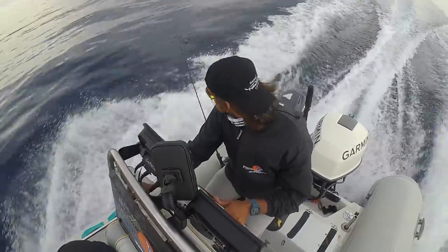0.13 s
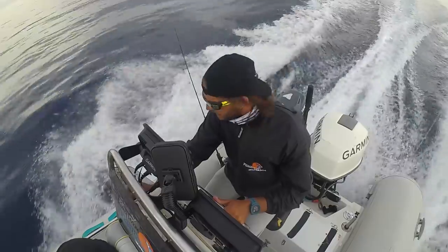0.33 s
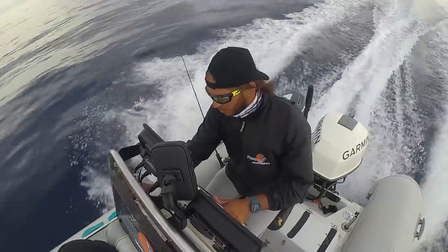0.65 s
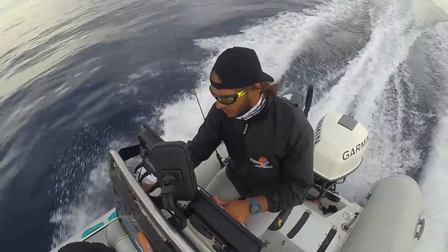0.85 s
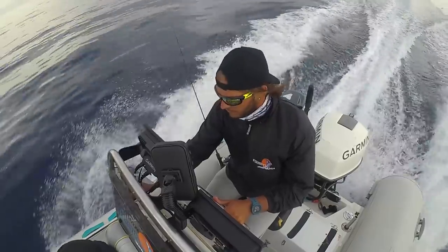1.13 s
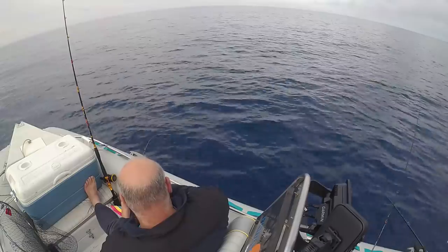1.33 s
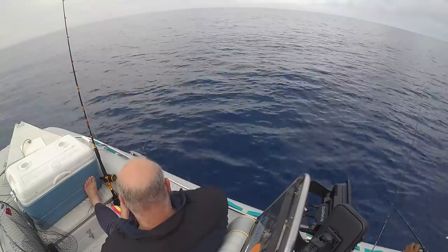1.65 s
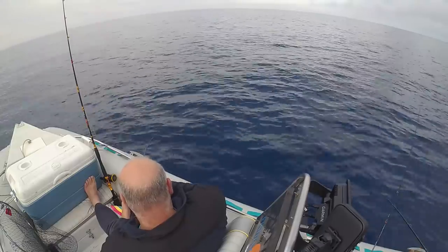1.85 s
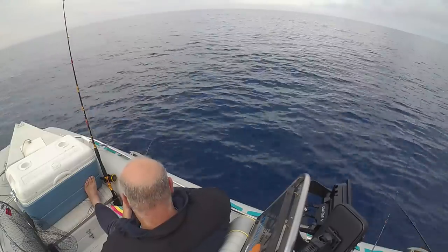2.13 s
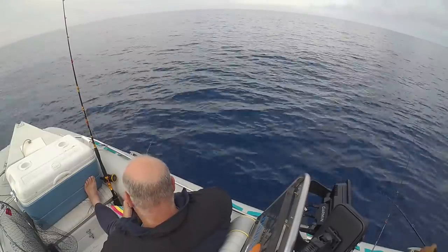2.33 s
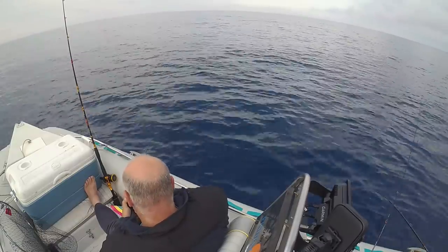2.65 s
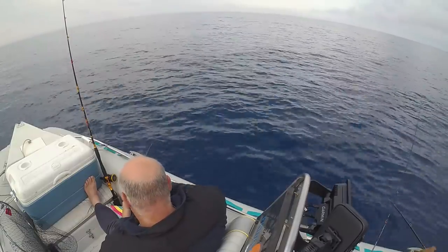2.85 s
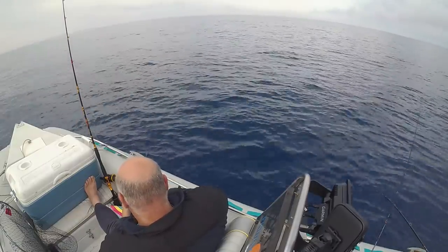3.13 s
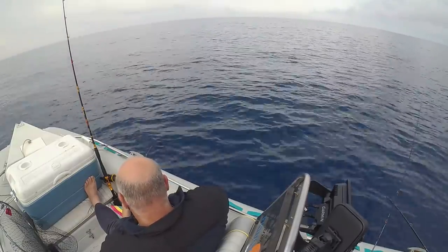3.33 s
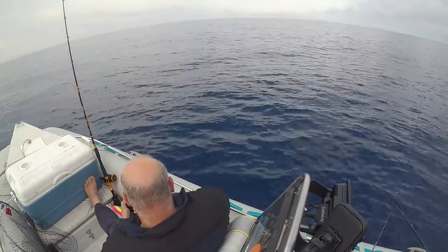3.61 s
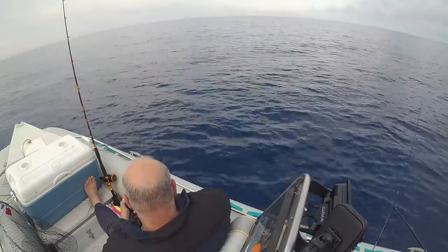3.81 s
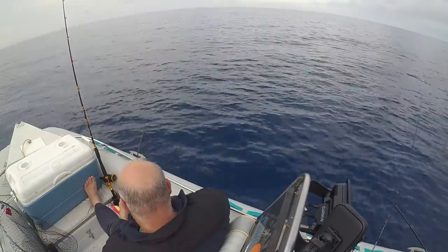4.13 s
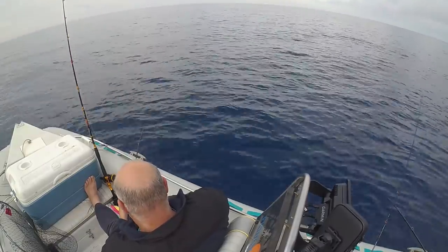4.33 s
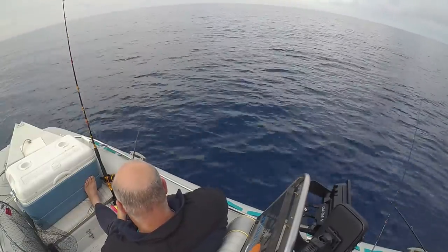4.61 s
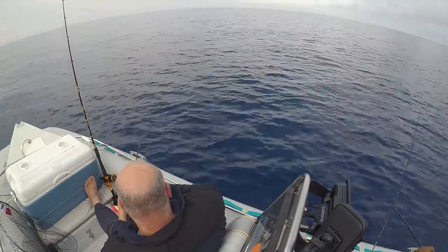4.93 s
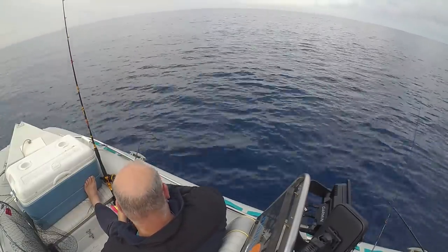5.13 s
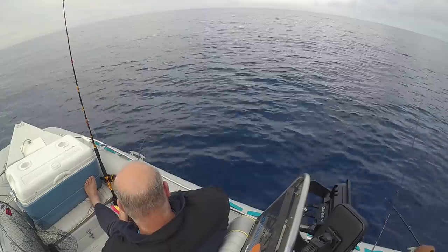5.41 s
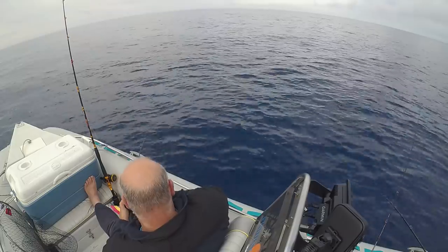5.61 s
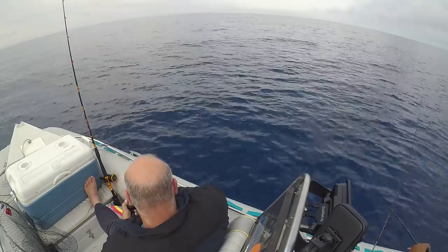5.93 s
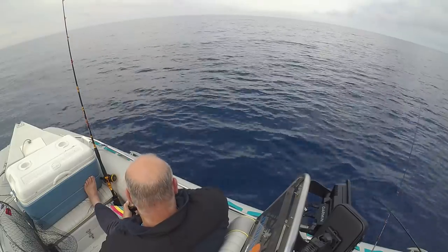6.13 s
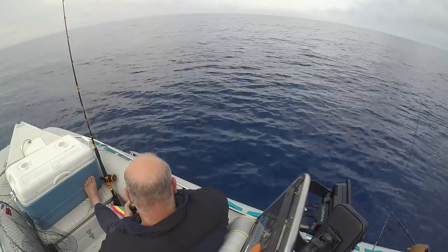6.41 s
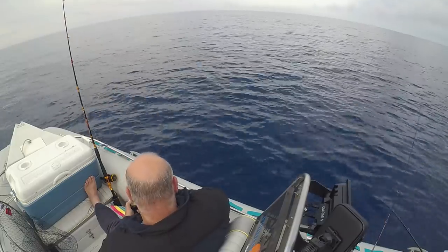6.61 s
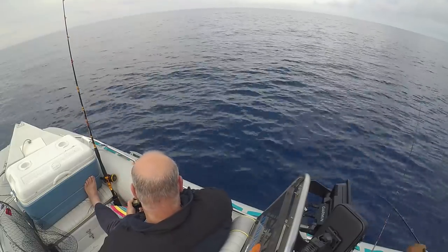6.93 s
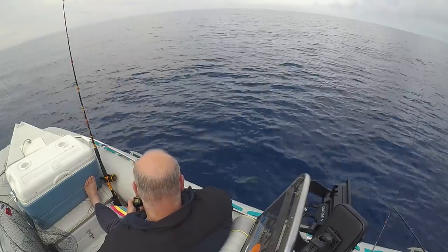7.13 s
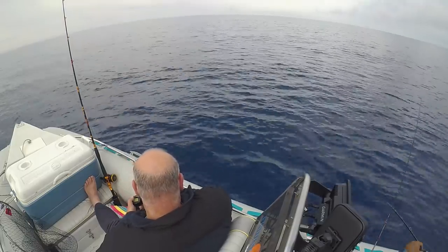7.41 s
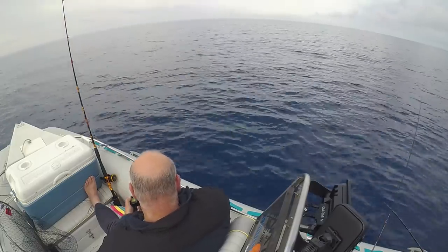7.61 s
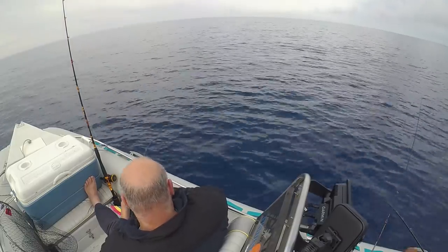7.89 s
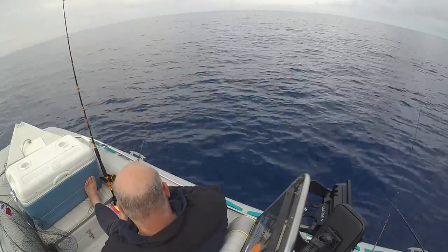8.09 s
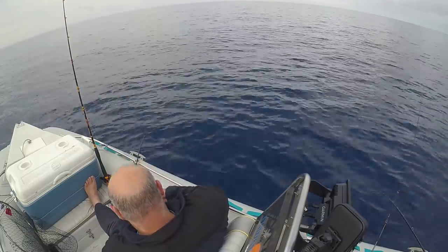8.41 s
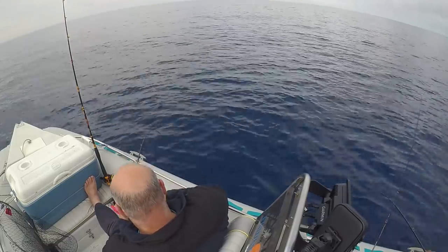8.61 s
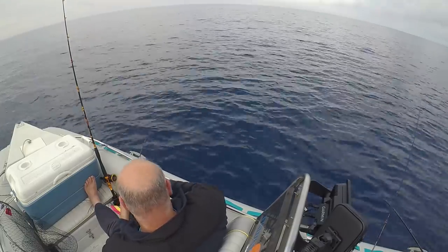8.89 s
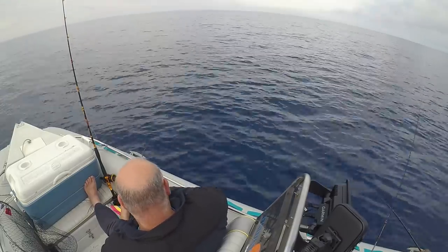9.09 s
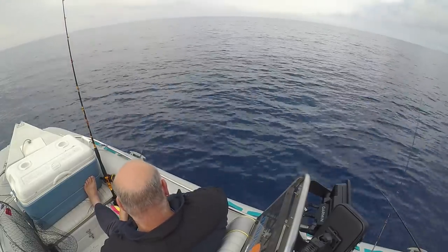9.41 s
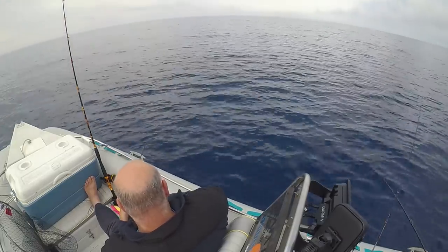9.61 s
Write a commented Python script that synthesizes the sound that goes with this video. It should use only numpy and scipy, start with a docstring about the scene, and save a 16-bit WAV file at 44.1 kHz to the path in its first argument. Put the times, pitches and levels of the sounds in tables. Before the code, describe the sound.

Muffled outboard drone and rushing water for about a second, a hard cut, then slow chugging idle with irregular rattling and dull hull thuds.

```python
"""A planing boat comes first: an outboard drone in the hull, with wind on a sealed case, wash and spray.
After a cut with a short silence the four-stroke motor idles. Its crank angle times exhaust thumps, floor booms,
cowl shakes and valve ticks. A loose part, knocks and clicks ring as decaying modes and noise bursts.
Underneath, coloured noise makes the wind, the lapping water and a thin whirr."""
import sys
import numpy as np
from scipy import signal
from scipy.fft import rfft, irfft, next_fast_len
from scipy.io import wavfile
from scipy.ndimage import uniform_filter1d, map_coordinates

SR = 44100
rng = np.random.default_rng(int(sys.argv[2]) if len(sys.argv) > 2 else 0)


def bounce(signal):
    """Save signal as a 16-bit WAV file at the path given by the first command-line argument."""
    frames = np.transpose(np.atleast_2d(signal))
    limited = np.clip(frames, -1, 1)
    pcm = np.round(limited * 32767).astype(np.int16)
    wavfile.write(sys.argv[1], SR, pcm)


N = 429975

# silence between the two scenes: (planing ends [s], idling starts [s])
GAP = (1.2417, 1.2536)
# layers while planing: (time [s], wind level [dB], wash level [dB], spray level [dB])
PLANING_LEVELS = [(0.0, -30, -25, -31), (0.22, -27, -25.5, -33.5), (0.335, -21.5, -22.5, -31),
                  (0.47, -28, -22.5, -31.5), (0.624, -37, -23, -33), (0.694, -19, -24.5, -34.5),
                  (0.96, -32, -24, -35.5), (0.998, -28, -25.5, -32.5), (1.24, -29, -24.5, -36.5)]
# hull drone while planing: (time [s], level [dB])
DRONE_LEVELS = [(0.0, -16.5), (0.082, -13), (0.116, -33), (0.144, -18), (0.746, -20), (0.772, -16.5),
                (0.818, -26.5), (0.91, -16), (0.976, -26), (1.014, -17), (1.24, -21)]
# idle speed: (time [s], four-stroke cycles per second [Hz])
IDLE_SPEED = [(1.25, 11.004), (1.89, 11.972), (2.01, 11.858), (2.65, 12.037), (3.37, 11.736),
              (3.49, 11.536), (3.85, 11.35), (4.53, 12.13), (4.65, 11.358), (5.21, 11.261), (5.53, 11.302),
              (5.65, 11.781), (5.93, 11.659), (6.05, 11.999), (6.41, 11.486), (6.73, 11.585),
              (7.37, 11.301), (7.81, 11.637), (8.17, 11.254), (8.73, 12.058), (9.21, 10.859),
              (9.75, 11.238)]
# two exhaust pulses in each cycle: (first [share of cycle], second [share of cycle])
FIRINGS = (.422, .84)
# exhaust resonances, each pass: (centre [Hz], width [Hz], gain [dB])
EXHAUST_MODES = [(15, 40, -.6), (48.1, 8, 0)]
# booming floor panel, each pass: (centre [Hz], width [Hz], gain [dB])
FLOOR_MODES = [(100.5, 11, 2)]
# floor boom at idle, before its random waver: (time [s], level [dB])
BOOM_LEVELS = [(1.26, -19), (1.3, -25.5), (2.28, -30.5), (2.32, -44), (2.37, -27), (3.52, -35), (3.6, -31),
               (3.77, -27), (3.81, -39.5), (4.12, -24.5), (4.38, -37.5), (4.43, -25), (4.5, -45),
               (4.78, -27.5), (5.16, -36.5), (5.23, -27.5), (5.75, -30.5), (5.82, -50), (5.89, -25.5),
               (6.2, -38), (6.63, -28), (6.67, -44), (6.77, -27), (7.05, -35), (7.1, -25.5), (7.36, -50),
               (7.41, -34), (7.74, -24.5), (7.79, -46), (7.9, -20), (7.97, -40), (8.4, -26), (8.97, -40),
               (9.75, -30)]
# cowl resonances, each pass: (centre [Hz], width [Hz], gain [dB])
COWL_MODES = [(185.1, 47.6, -2), (263, 9.3, -6)]
# shakes of the cowl: (angle [share of cycle], strength [dB])
COWL_SHAKES = [(.645, 1.5), (.955, 0), (.265, -3.5)]
# contacts in every cycle: (angle [share of cycle], rms level [dB], centre [Hz], width [octaves], t60 [s])
CONTACTS = [(.06, -67.5, 5200, .4, .16), (.065, -73, 3815, .05, .07), (.312, -72, 5700, .45, .012),
            (.347, -71.5, 6400, .5, .03), (.45, -71, 5600, .3, .05), (.64, -71, 3850, .06, .05),
            (.6, -65.5, 4900, .45, .14), (.64, -88, 10300, .15, .08), (.88, -65, 4800, .8, .15),
            (.9, -75, 3800, .08, .06), (.308, -62.5, 1300, .5, .11), (.315, -71, 1592, .064, .15),
            (.33, -73, 2600, .15, .25), (.455, -63, 2130, .5, .3), (.46, -70, 2060, .08, .15),
            (.76, -73, 1930, .1, .05), (.05, -54.5, 428, .18, .07), (.088, -67, 1050, .097, .076),
            (.21, -61, 680, .23, .085), (.48, -66, 1100, .29, .06), (.66, -57, 300, .18, .037),
            (.69, -61, 700, .18, .15), (.72, -52.5, 416, .14, .057), (.88, -68, 900, .17, .15)]
# loud rattles: (time [s], level [dB], second pair over it [dB])
RATTLE_HITS = [(1.654, -29, -0.5), (1.765, -22.5, -12), (1.849, -23.5, -8), (1.934, -28, -4),
               (1.988, -43, 0.5), (2.105, -28.5, -8), (2.271, -32.5, 1), (2.459, -31.5, 2.5),
               (2.503, -26, -3), (3.061, -33, -26), (3.242, -33, -5), (3.36, -24, -4.5), (3.439, -27, -12),
               (3.53, -40, 6.5), (3.829, -24.5, -8), (3.942, -35.5, 1), (4.076, -29, 4), (4.203, -38, 7.5),
               (4.313, -31, -6), (4.365, -33.5, 1), (4.481, -35, -15), (4.709, -36, 1), (4.849, -25, -14),
               (4.885, -28, -4), (4.975, -36.5, 8), (5.418, -34.5, 0.5), (5.679, -30, 1), (5.815, -40, 4),
               (5.848, -31.5, -3), (5.887, -22, -5.5), (5.991, -23.5, -1), (6.134, -23.5, -10),
               (6.218, -22.5, -23), (6.306, -29.5, -22), (6.354, -31, -4), (6.393, -29, -22),
               (6.479, -26, -16), (6.562, -28, -3.5), (6.734, -35, 2), (6.788, -42.5, 0),
               (6.909, -35.5, 0.5), (7.057, -46, 14), (7.403, -37, 4.5), (7.491, -33, -2),
               (7.582, -39.5, 8.5), (7.789, -23.5, -16.5), (7.87, -22.5, -20), (7.955, -24, -11),
               (8.04, -28, -1.5), (8.454, -37, 6), (8.935, -32, 0), (9.101, -35, -2), (9.409, -28.5, -5),
               (9.505, -33.5, 3.5), (9.679, -32, -4)]
# modes of the loose part: (frequency [Hz], relative level [dB], t60 [s])
LOOSE_MODES = [(331.5, 3, 0.078), (358.4, -11.5, 0.15), (423.5, 1.5, 0.1), (465, 0.5, 0.09),
               (651, -8, 0.073), (722.5, -14, 0.12), (1028, -14, 0.044)]
# modes whose strength depends on where the part lands: (lower [row], upper [row])
SECOND_PAIR = (2, 3)
# dull hull knocks, low from waves, high from handling: (time [s], level [dB], frequency [Hz], t60 [s])
KNOCK_HITS = [(1.012, -10.5, 134.2, 0.27), (1.289, -39, 118.5, 0.54), (1.323, -10.5, 195, 0.08),
              (1.391, -29.5, 970, 0.033), (2.791, -36, 1385, 0.023), (3.727, -25, 613, 0.043),
              (3.834, -12.5, 183.7, 0.19), (3.867, -31, 126, 0.11), (5.291, -28, 492, 0.068),
              (5.311, -19.5, 128, 0.39), (3.069, -25, 252, 0.18), (7.132, -26, 361, 0.11),
              (8.369, -23, 1340, 0.0094), (9.68, -26, 188, 0.22)]
# thin clicks of tackle: (time [s], level [dB])
CLICK_HITS = [(1.4242, -56), (1.4962, -56), (4.35, -58), (4.77, -57), (5.29, -57), (7.0687, -57)]
# muffling case with two port resonances: (frequency [Hz], gain [dB])
CASE_COLOUR = [(240, -10), (400, 0), (700, -10), (1020, -14), (1600, -18.5), (2400, -26), (3400, -25.5),
               (3950, -21), (4380, -10.5), (4900, -24), (5800, -29.5), (6400, -36), (7500, -42),
               (9000, -49), (10000, -34), (11500, -44.5), (14000, -55.5), (15000, -67.5), (16000, -120)]
# spectrum of the water under the planing hull: (frequency [Hz], relative level [dB per Hz])
WASH_COLOUR = [(65, -16), (110, -3.5), (124, -12.5), (173, -10), (340, -14), (518, -34), (1200, -43),
               (1560, -89), (2640, -120)]
# spectrum of the water against the idling hull: (frequency [Hz], relative level [dB per Hz])
LAPPING_COLOUR = [(29, -44.5), (50, -7), (108, -5.5), (147, -11.5), (201, -6), (303, -18.5), (413, -21),
                  (546, -24), (1580, -37.5), (2500, -53.5), (3250, -68.5), (5500, -120)]
# wind on the case at idle: (time [s], level [dB])
BREEZE_LEVELS = [(1.26, -24), (1.45, -36), (4.8, -36), (5.3, -33), (5.9, -38), (8.6, -59), (9.3, -32.5),
                 (9.75, -33)]
# panel that carries the drone, each pass: (centre [Hz], width [Hz], gain [dB])
DRONE_PANEL = [(82.0, 70, 0)]
# wind spectra, planing and idling: (frequency [Hz], relative level [dB])
PLANING_WIND = [(8, -36), (20, -5.0), (60, -1.0), (85, -1.0), (200, -65), (400, -120)]
IDLE_WIND = [(6, -36.5), (14, 8.5), (24, 5.0), (70, -24.0), (120, -62.0), (300, -120)]

DRONE_HZ = 93.9
FIRST_ANGLE, UNEVEN = .154, .002  # crank angle at the start of idling, and its wander [share of cycle]
FLOOR_SHAKE = .14  # angle at which the floor is struck [share of cycle]
BOOM_WAVER_DB = 2  # random swell and dip of the boom
LASH_S, VALVE_SCATTER_DB = .0003, 1.4  # play in the timing and strength of each contact
CRACK_DB = -13.5  # noise crack relative to the rattle level
TOP_FADES = 0.24  # dB the top mode loses for each dB the second pair gains
LANDING_DB = 1.5  # chance in the strength of each mode at each rattle
CLICK_HZ, CLICK_T60_S = 8000, 0.028  # lower edge, decay
WHIRR_DB, WHIRR_TILT = -64.5, .8  # level, and power of frequency by which it brightens
CLIP_AT = .6  # amplitude near which peaks round off
TOP_HZ = 15000  # upper band limit


def hull_drone(tone):
    """Firing drone in the hull: a wavering tone with a noise band from a broad panel resonance."""
    panel = modes(DRONE_PANEL)
    roughness = rush(lambda f: panel(f) ** 2, patchy_db=1.0)
    level_db, = curves(DRONE_LEVELS)
    return amp(level_db) * (0.96 * tone + 0.35 * roughness)


def exhaust(turned):
    """Each cylinder's firing is an impulse that thumps through the exhaust resonances."""
    firings = sum(beats(turned, share, scatter_db=1.5) for share in FIRINGS)
    return amp(-30.0) * unit(filtered(firings, twice(EXHAUST_MODES)))


def floor_boom(turned):
    """The motor block strikes the floor panel once a cycle; noise in the panel's own resonance blurs it."""
    panel = twice(FLOOR_MODES)
    struck = unit(filtered(beats(turned, FLOOR_SHAKE, scatter_db=-0.5), panel))
    blur = rush(panel, patchy_db=0.9)
    boom = steady(0.72 * struck + 0.63 * blur, seconds=0.12)
    level_db, = curves(BOOM_LEVELS)
    return amp(level_db + BOOM_WAVER_DB * wobble(5.3)) * boom


def cowl(turned):
    """The motor block shakes the resonant cowl three times a cycle, blurred by noise in the same resonances."""
    shakes = sum(amp(db) * beats(turned, share, scatter_db=2.5) for share, db in COWL_SHAKES)
    shaken = unit(filtered(shakes, twice(COWL_MODES)))
    blur = rush(twice(COWL_MODES), patchy_db=-2.5)
    return amp(-41.5) * (1.136 * shaken + 0.2 * blur)


def valves(turned):
    """Each contact repeats its own noise burst in every cycle, blurred by fresh noise, behind the case."""
    out, t = np.zeros(N), np.arange(SR // 12) / SR
    case = colour(CASE_COLOUR)
    for share, db, hz, octaves, t60 in CONTACTS:
        fade = amp(-60 * t / t60) * (1 - np.exp(-t / 0.00031))
        hits = beats(turned, share, VALVE_SCATTER_DB, LASH_S)
        same = signal.oaconvolve(hits, fade * rng.standard_normal(len(t)))[:N]
        fresh = signal.oaconvolve(hits, fade)[:N] * rng.standard_normal(N)

        def band(f):
            """Bell on an octave axis, seen through the case; case gain is held below 600 Hz."""
            return np.exp(-.5 * (np.log2((f + 1) / hz) / octaves) ** 2) * case(np.maximum(f, 600))

        out += amp(db) * unit(filtered(0.7 * same + 0.7 * fresh, band))
    return out


def rattles():
    """A loose part rings its modes at new strengths on each hit, with a short noise crack."""
    out, t = np.zeros(N + SR), np.arange(SR // 50) / SR
    top = len(LOOSE_MODES) - 1
    for s, db, pair_db in RATTLE_HITS:
        for k, (hz, mode_db, t60) in enumerate(LOOSE_MODES):
            strength = db + mode_db + rng.normal(0, LANDING_DB)
            if k in SECOND_PAIR:
                strength += pair_db
            if k == top:
                strength -= TOP_FADES * pair_db
            mode = ring(hz * rng.normal(1, 0.02), t60, attack=0.0049)
            add(out, s - .003, amp(strength) * mode)  # modes start 3 ms ahead of the crack
        crack = filtered(rng.standard_normal(len(t)), colour(CASE_COLOUR))
        add(out, s, amp(db + CRACK_DB - 60 * t / .012) * crack)
    return out[:N]


def knocks():
    """A dull hull knock is a decaying mode roughened by a longer neighbour above it."""
    out = np.zeros(N + SR)
    for s, db, hz, t60 in KNOCK_HITS:
        main = ring(hz, t60, attack=1.74 / hz)
        neighbour = ring(1.17 * hz, 1.9 * t60, attack=1.0 / hz)
        add(out, s, amp(db) * (main + 0.32 * neighbour))
    return out[:N]


def clicks():
    """Tackle clicks are brief decaying bursts of high noise."""
    out, t = np.zeros(N + SR), np.arange(SR // 50) / SR
    for s, db in CLICK_HITS:
        noise = rng.standard_normal(len(t))
        thin = filtered(noise, lambda f: (f > CLICK_HZ) / (1 + (f / 12500) ** 8))
        add(out, s, amp(db - 60 * t / CLICK_T60_S) * thin)
    return out[:N]


def wash(level_db, tone):
    """Water under the planing hull: low noise whose level flutters with the drone."""
    return amp(level_db + 0.26 * wobble(25.1) + 1.2 * tone) * rush(colour(WASH_COLOUR), patchy_db=0.5)


def spray(level_db, tone):
    """Spray through the case: bright noise stirred by each firing."""
    return amp(level_db + 1.1 * wobble(42.3) + 0.48 * tone) * rush(colour(CASE_COLOUR), patchy_db=0.9)


def lapping():
    """Water along the idling hull: low noise that comes in lumps."""
    return amp(-37 + 1.43 * wobble(16)) * rush(colour(LAPPING_COLOUR), patchy_db=1.5)


def whirr():
    """The motor's thin whirr: brightened noise through the case."""
    case = colour(CASE_COLOUR)
    return amp(WHIRR_DB) * rush(lambda f: case(f) * f ** WHIRR_TILT, patchy_db=2)


def wind(level_db, spectrum, patchy_db):
    """Wind buffets the case as patchy low noise."""
    return amp(level_db) * rush(colour(spectrum), patchy_db)


def firing_tone():
    """A sine at the firing rate with a wandering pitch, rms 1."""
    hz = DRONE_HZ + 0.44 * wobble(6.3)
    return np.sqrt(2) * np.sin(2 * np.pi * np.cumsum(hz) / SR)


def crank():
    """Cycles turned at each sample: the running sum of idle speed, plus a small wander."""
    running = np.arange(N) >= IDLE_SPEED[0][0] * SR
    speed, = curves(IDLE_SPEED)
    return FIRST_ANGLE + np.cumsum(speed * running) / SR + UNEVEN * wobble(12)


def beats(turned, share, scatter_db, lash_s=0):
    """One impulse each time the crank passes this share of the cycle, a little early or late."""
    passes = np.flatnonzero(np.diff(np.floor(turned - share)) > 0)
    size, late = rng.standard_normal((2, len(passes)))
    places = passes + np.round(lash_s * SR * late).astype(int)
    out = np.zeros(N)
    out[np.clip(places, 0, N - 1)] = amp(scatter_db * size)
    return out


def ring(hz, t60, attack):
    """One decaying mode with a soft attack."""
    t = np.arange(SR // 4) / SR
    return np.sin(2 * np.pi * hz * t) * amp(-60 * t / t60) * (1 - np.exp(-t / attack))


def rush(response, patchy_db):
    """Coloured noise of rms 1 with smooth patches of random gain over time and frequency."""
    z = signal.stft(rng.standard_normal(N), nperseg=512)[2]
    field = uniform_filter1d(rng.standard_normal(z.shape), size=6, axis=0)
    field = uniform_filter1d(field, size=8, axis=1)
    patchy = signal.istft(z * amp(patchy_db * field / field.std()), nperseg=512)[1][:N]
    return unit(filtered(patchy, response))


def modes(rows):
    """Causal response of resonances with alternating sign."""
    def response(f):
        return sum((-1) ** k * amp(db) * 1j * f * w / (c * c - f * f + 1j * f * w)
                   for k, (c, w, db) in enumerate(rows))
    return response


def twice(rows):
    """Resonances passed twice for dark valleys, with a rolloff above 500 Hz."""
    return lambda f: modes(rows)(f) ** 2 / (1 + (f / 500) ** 4)


def colour(points):
    """Gain drawn through frequency and dB points on a log frequency axis."""
    f, db = np.transpose(points)
    return lambda hz: amp(np.interp(np.log(hz + 1), np.log(f + 1), db))


def filtered(x, response):
    """x shaped by a frequency response, padded so its tail does not wrap."""
    m = next_fast_len(len(x) + SR // 2)
    return irfft(rfft(x, m) * response(np.fft.rfftfreq(m, 1 / SR)), m)[:len(x)]


def amp(db):
    """Linear gain of a level in dB."""
    return 10 ** (np.asarray(db) / 20)


def unit(x):
    """x scaled to rms 1 over the time from 2 s on."""
    return x / np.sqrt(np.mean(x[2 * SR:] ** 2) + 1e-30)


def steady(x, seconds):
    """x with its slow level changes divided out."""
    power = np.abs(uniform_filter1d(x ** 2, size=int(seconds * SR)))
    return x / np.sqrt(power + 0.02 * np.mean(x ** 2))


def curves(rows):
    """One value per sample for each column after the time."""
    s, *cols = np.transpose(rows)
    return [np.interp(np.arange(N) / SR, s, c) for c in cols]


def wobble(rate):
    """A smooth random curve, rate knots a second."""
    knots = rng.standard_normal(int(N * rate / SR) + 4)
    return map_coordinates(knots, [np.arange(N) * rate / SR])


def add(track, s, sound):
    """Mixes a sound into the track from s seconds."""
    track[round(s * SR):][:len(sound)] += sound


def planing():
    """The boat at speed: drone, wash and spray share one firing tone, under wind."""
    wind_db, wash_db, spray_db = curves(PLANING_LEVELS)
    tone = firing_tone()
    water = wash(wash_db, tone) + spray(spray_db, tone)
    return hull_drone(tone) + water + wind(wind_db, PLANING_WIND, patchy_db=4.5)


def idling():
    """The motor at idle: one crank drives its thumps, booms, shakes and ticks over water and wind."""
    turned = crank()
    motor = exhaust(turned) + floor_boom(turned) + cowl(turned) + valves(turned)
    breeze_db, = curves(BREEZE_LEVELS)
    return motor + lapping() + whirr() + wind(breeze_db, IDLE_WIND, patchy_db=-3.0)


def scene():
    """Planing, a gap, then idling; rattles, knocks and clicks are mixed in without the fades."""
    t = np.arange(N) / SR
    fade_out = np.clip((GAP[0] - t) / .0008, 0, 1)
    fade_in = np.clip((t - GAP[1]) / .001, 0, 1)
    contacts = rattles() + knocks() + clicks()
    return (planing() * fade_out + idling() * fade_in + contacts)[None]


def record(dry):
    """Rounds off the loudest peaks and keeps nothing above the band limit."""
    rounded = dry[0] / (1 + np.abs(dry[0] / CLIP_AT) ** 4) ** .25
    return filtered(rounded, lambda hz: hz < TOP_HZ)[None]


dry = scene()
out = record(dry)
bounce(out)
```